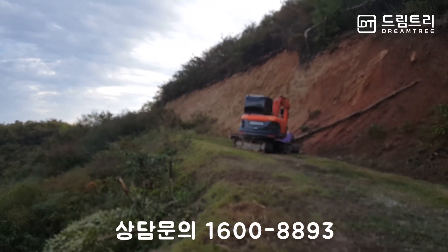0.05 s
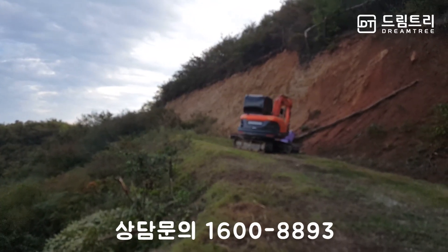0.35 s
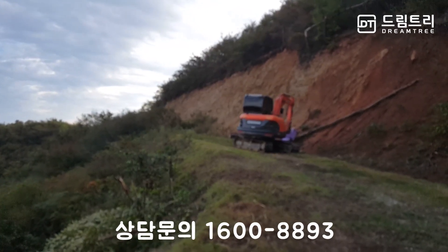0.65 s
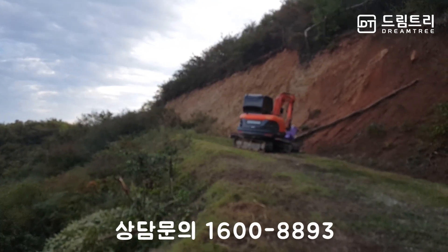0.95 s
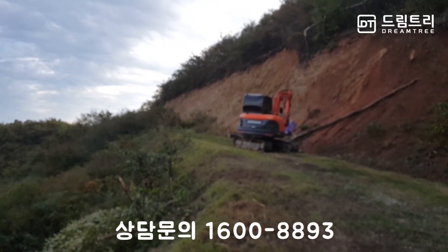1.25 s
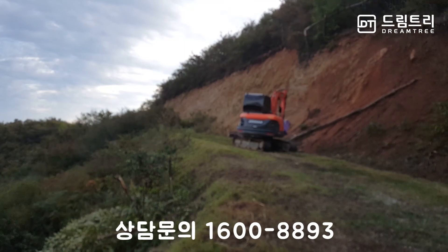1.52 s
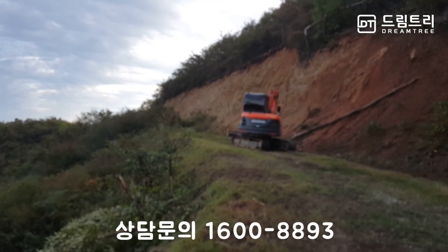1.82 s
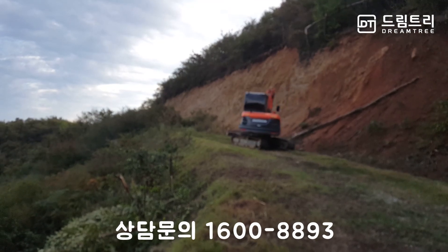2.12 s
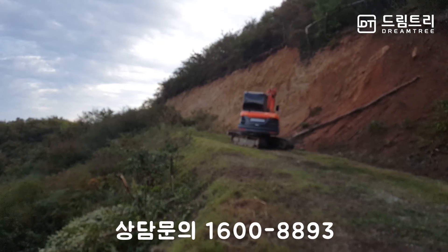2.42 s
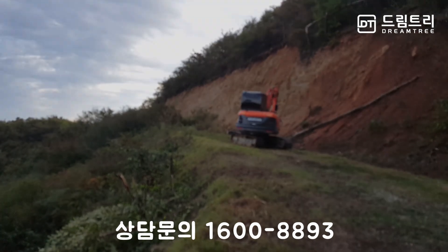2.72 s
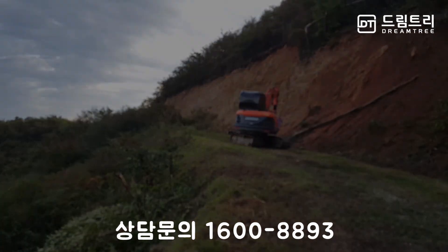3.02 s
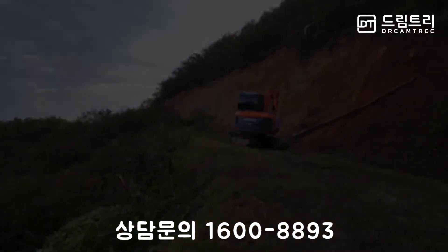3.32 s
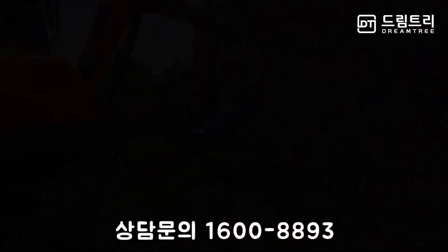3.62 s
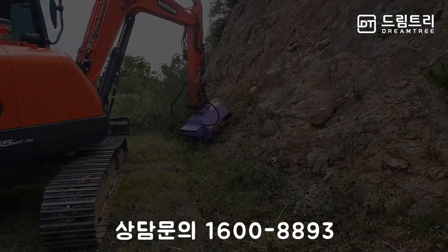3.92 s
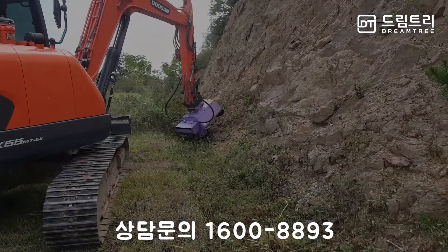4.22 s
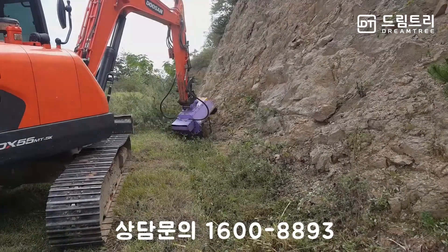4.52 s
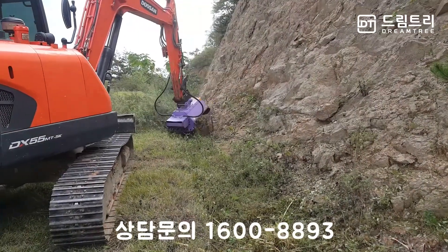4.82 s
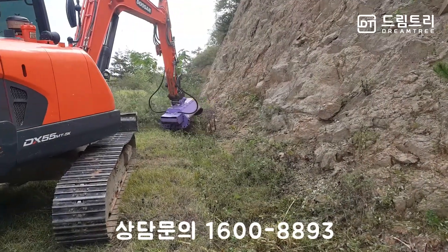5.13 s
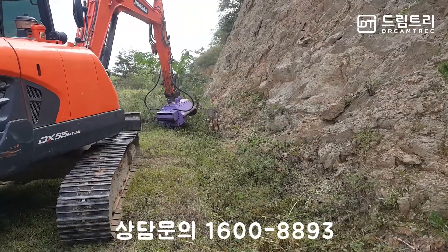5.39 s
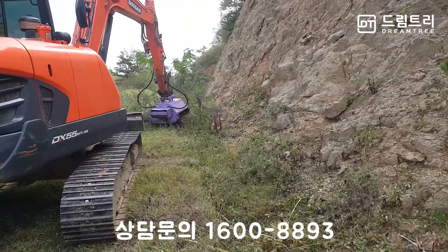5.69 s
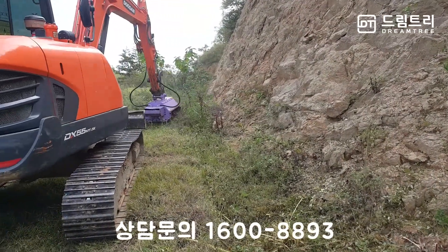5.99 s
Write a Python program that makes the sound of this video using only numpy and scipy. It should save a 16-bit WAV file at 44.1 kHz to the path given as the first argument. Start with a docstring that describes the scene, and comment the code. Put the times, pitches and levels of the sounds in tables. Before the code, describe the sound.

Heard from afar in the open, a diesel excavator hums and knocks, with light metal clanks, a few dull scrapes and faint chirping crickets. Everything fades away, and the machine fades back in right beside the microphone. Over the engine's drone, a flail cutter tears through brush: sticks snap, the head thumps the ground and stones crack against metal in a loud flurry, followed by shorter bites.

```python
"""At the foot of a rock slope, a small diesel excavator mulches brush, heard from two places in turn.
Far off, crickets chirp and leaves hiss while four cylinders drone through the exhaust and knock against
the engine panels. This fades to a short silence. Then, beside the track, the engine is close and the
flail head shreds twigs in a bright crackle, grinds into the soil and flings stones against its hood."""
import sys
import numpy as np
from scipy import signal
from scipy.fft import rfft, irfft, next_fast_len
from scipy.io import wavfile
from scipy.ndimage import uniform_filter1d, map_coordinates

SR = 44100
rng = np.random.default_rng(int(sys.argv[2]) if len(sys.argv) > 2 else 0)


def wrap_up_sound(samples):
    """Save the sound to the file named by the first command line argument, as 16-bit audio."""
    columns = np.atleast_2d(samples).T
    # keep every value between -1 and 1, then stretch to whole-number steps
    tamed = np.clip(columns, -1, 1)
    steps = np.round(tamed * 32767).astype(np.int16)
    wavfile.write(sys.argv[1], SR, steps)


N = 271215
TIME = np.arange(N) / SR
SIZE = next_fast_len(N + 4096)
FREQ = np.maximum(np.arange(SIZE // 2 + 1) * SR / SIZE, 1)

# Stereo image of the distant machine, close engine and head: freq_hz, left_minus_right_db, likeness (0-1)
FAR_IMAGE = [(150, 0.5, 0.99), (400, 2.5, 0.97), (700, 2, 0.93), (1320, 6, 0.98), (3000, 3, 0.51),
             (4130, -1.5, 1), (5500, 12.5, 0), (6550, 5.5, 0.7), (7800, -3.5, 0.4), (15000, 2, 0.4)]
ENGINE_IMAGE = [(147, 0.85, 0.95), (387, 2.8, 0.76), (790, 4.2, 0.99), (1330, 4.1, 0.74), (2400, 6.4, 0.47),
                (8000, 1.6, .2)]
HEAD_IMAGE = [(199.75, -12, 0.48), (705, 3, 0.76), (1300, 4.5, 0.88), (2400, 2.5, 1), (3930, -7, 0.4),
              (6300, 3, 0.2), (7500, -13, 0.11), (9300, -11, 0.11), (12000, 1, .1), (15000, -1.5, .1)]
# Crickets in the grass: pitch_hz, chirps_per_s, first_chirp_s, level_db, scatter_db
CRICKETS = [(4980, 15.65, 0.01, -52.5, 2), (4140, 16, 0.043, -55.5, 4.5)]
# Engine speed: time_s, firing_hz
ENGINE_SPEED = [(0, 54.6), (.55, 54.42), (.9, 54.6), (1.12, 53.6), (1.45, 54.03), (1.85, 55.67),
                (2.05, 54.43), (2.6, 54.4), (3.05, 54.04), (3.3, 54.6), (3.9, 54.2), (4.2, 54), (4.7, 54.8),
                (5.2, 54.58), (5.6, 54.16), (5.8, 53.82), (6.0, 53.2), (6.15, 54.36)]
# Hydraulic load on the distant machine: time_s, load (0-1)
HYDRAULIC_LOAD = [(0, 0.18), (.6, 0.02), (.74, 0.64), (.87, 0.33), (1.02, 0.23), (1.15, 0.87), (1.65, 0.92),
                  (2.08, 0.5), (2.28, 0.97), (2.65, 1)]

# Distant EQ of fan air and leaves, soil, exhaust, engine block, boom steel and cover: freq_hz, gain_db
FAR_HISS_EQ = [(60, -1), (600, 4), (2500, 5.5), (3500, 0), (5300, -1), (6300, 0.5), (7400, -7), (8800, -19),
               (10500, -21), (12200, -13), (14500, -21), (15700, -32.5)]
FAR_SOIL_EQ = [(50, -35), (200, 0), (350, -5.5), (490, 5.5), (700, -3), (1100, -8.5), (2000, -13),
               (4000, -18.5), (7000, -30), (10000, -44)]
FAR_EXHAUST_EQ = [(25, -28), (42, -19), (70, -9), (100, -1), (140, 2), (180, 2.5), (225, -1.5), (260, -10),
                  (340, -20), (700, -58)]
FAR_BLOCK_EQ = [(60, -42), (400, -10.5), (650, -2), (780, -11), (1170, -13), (1600, -8.5), (2100, -7),
                (3150, -13), (3400, -26), (4500, -16.5), (6400, -20), (9000, -44)]
STEEL_EQ = [(1000, -35), (2400, -28), (2900, 1), (3900, 3), (4500, -24), (8000, -32)]
COVER_EQ = [(700, -35), (1000, -9), (1200, -3), (1400, 7), (1650, -14), (2200, -36)]
# Distant resonances of engine panels, boom steel and engine cover: pitch_hz, width_hz, lift_db
FAR_PANEL_RINGS = [(586, 56, 6.2), (943, 232, 21.5), (1352, 97, 14), (1460, 160, 9.9), (1752, 200, 9.9),
                   (2706, 120, 7.4), (3050, 110, 7.5), (3920, 130, 10.4), (4980, 140, 5)]
STEEL_RINGS = [(2980, 200, 16.6), (3345, 110, 14.7), (3730, 110, 4), (3900, 140, 6)]
COVER_RINGS = [(1350, 80, 7), (1480, 80, 8.4)]
# Faders for the distant exhaust and the pipe's hum: time_s, gain_db
FAR_EXHAUST_FADER = [(0.0, -33), (0.9, -32.5), (1.15, -31), (1.4, -34), (1.52, -30), (1.56, -34),
                     (2.63, -36), (2.85, -33.5), (3.15, -36)]
FAR_HUM_FADER = [(0, -42.5), (.45, -43), (.8, -44.5), (1.05, -43), (1.5, -48.5), (1.95, -42), (2.12, -52),
                 (2.35, -42), (2.65, -46.5), (2.87, -40), (3.1, -46.5)]
# Distant exhaust harmonics, relative to the exhaust fader: firing_multiple, idle_db, full_load_rise_db
FAR_HARMONICS = [(2, -17.5, 7.5), (2.5, -20.5, 8.5), (3, -25, 4)]
# Ring of the boom steel and clang of the cover, relative to the knock: time_s, gain_db
STEEL_FADER = [(.95, -19), (1.55, -11.5), (2.3, -11.5), (3.1, -15.5), (3.3, -8.5)]
COVER_FADER = [(0, -14), (.65, -13), (.92, -25), (1.17, -19), (1.4, -17), (1.8, -31)]
# How much of the distant knock comes as distinct blows: time_s, share (0-1)
KNOCK_HARDNESS = [(0, 0.65), (.13, 0.54), (.35, 0.16), (.85, 0.52), (1.02, .3), (1.16, 0.66), (1.5, 0.63),
                  (1.85, 0.4), (2.1, 0.4), (2.45, 0.5), (3.05, 0.48), (3.25, 0.6)]
# The knock's tone colour glides slightly up and down as the machine swings: time_s, shift_percent
COLOUR_GLIDE = [(0, 0), (.9, 1.3), (1.25, 3), (1.6, -0.42), (2.0, -3), (2.5, -2), (3.2, 0)]
# Hard blows that clank out of the rattle: start_s, level_db, pitch_hz
PANEL_CLANKS = [(.119, -41, 1390), (.635, -33.5, 1480), (.779, -37, 1010), (.89, -34, 1410),
                (1.037, -36, 1410), (1.132, -32, 1320), (1.151, -34, 1005), (1.168, -30.5, 1500),
                (1.188, -37, 1380), (1.226, -40, 1000), (1.298, -37, 1500), (1.335, -32, 1344),
                (1.372, -36, 1380), (1.41, -34, 1420), (1.448, -41, 3100), (1.485, -35, 1350),
                (1.501, -34, 1370), (1.522, -38, 988), (1.576, -41, 3040), (1.594, -34.5, 982),
                (1.631, -42, 3010), (1.668, -35, 906), (1.812, -36, 947), (2.01, -36, 932),
                (2.159, -40, 1370), (2.25, -39, 920), (2.397, -38.5, 1370), (2.582, -35, 921),
                (2.8, -34, 1370), (2.931, -38, 940), (3.28, -32, 950)]
# The distant head scrapes the soil: start_s, length_s, level_db
SOIL_SCRAPES = [(0.32, 0.05, -53), (0.772, 0.037, -53), (1.915, 0.073, -45.5), (2.25, 0.065, -45),
                (2.454, 0.029, -48), (2.547, 0.042, -44.5), (2.85, 0.017, -51), (3.133, 0.08, -47.5)]
# The distant head bumps the ground: start_s, boom_db, boom_hz, clack_db
FAR_THUDS = [(1.93, -44, 398, -48), (2.265, -30, 494, -36), (2.581, -38.5, 516, -39)]

# Close EQ of exhaust, engine block, twigs, soil and hood: freq_hz, gain_db
NEAR_EXHAUST_EQ = [(25, -34), (42, -23), (70, -14), (95, -2), (135, -3), (180, -4), (245, -2), (320, -10.5),
                   (420, -8.5), (600, -17.5), (1200, -55)]
NEAR_BLOCK_EQ = [(40, -22), (150, 6), (400, -11.5), (560, 3.5), (670, -3.5), (1030, -10), (1400, -11),
                 (2100, -9), (3200, -8), (4000, -21), (7000, -25), (10000, -27), (15700, -21)]
TWIG_EQ = [(1500, -10), (3500, -12), (5300, -6), (6400, 1), (7400, 3.5), (8300, -4.5), (9500, -12.5),
           (10800, -9), (12300, -4.5), (14000, -6.5), (15700, -11)]
SOIL_EQ = [(40, -32), (150, -28), (300, -35), (600, 2.5), (1150, 3), (1400, 1.5), (2100, 1.5), (2900, 3.5),
           (4200, 4), (5300, -1.5), (7500, -4), (10000, -16), (15700, -23)]
HOOD_EQ = [(40, -35), (200, -16), (800, 12), (3000, -6), (7300, -1.5), (9500, -14), (12500, -7.5),
           (15700, -10)]
# Close resonances of engine panels and hood: pitch_hz, width_hz, lift_db
NEAR_PANEL_RINGS = [(410, 83, 5.3), (807, 122, 9.7), (903, 113, 7.2), (1210, 78, 4.8), (1563, 190, 11.4),
                    (1965, 29, 10.6), (2340, 110, 6.2), (2547.4, 110, 3.3)]
HOOD_RINGS = [(1133, 17, 14.5), (1215, 15, 3), (1642, 22, 10.5), (2889.5, 25, 4), (3450, 25, 3.5),
              (4420, 25, 7.5), (5780, 44, 6), (6400, 40, 10), (6750, 38, 16), (7390, 27, 6)]
# Close faders for whine, firing tone, exhaust (as the pipe swings), pipe hum, growl: time_s, gain_db
NEAR_WHINE_FADER = [(4.2, -40.5), (4.53, -36.5), (4.964, -37), (5.48, -51), (5.536, -41), (6.15, -31)]
NEAR_FIRING_FADER = [(3.7, -37), (4.2, -42), (5.0, -42), (5.85, -43), (6.07, -35)]
NEAR_EXHAUST_FADER = [(3.8, 1.5), (4.1, 3), (4.4, 1), (4.95, -0.5), (5.2, 1), (5.5, -1.5), (5.95, 1.5)]
NEAR_HUM_FADER = [(3.68, -35.5), (4.0, -28.5), (4.3, -28.5), (4.75, -29.5), (4.916, -31.5), (4.99, -26),
                  (5.35, -27.5), (5.814, -32), (6.1, -30)]
GROWL_FADER = [(4.42, -57), (4.6, -40), (4.7, -41), (4.82, -30.5), (4.97, -49), (5.1, -36), (5.26, -47),
               (5.37, -38.5), (5.52, -42), (5.65, -35), (5.76, -42), (5.86, -39), (5.94, -48), (6.0, -39),
               (6.1, -33), (6.15, -45.5)]
# Close harmonics of the exhaust, and of the growl near 800 Hz: firing_multiple, relative_db
NEAR_HARMONICS = [(1.5, -20), (2.5, -5), (3, -11), (5, -28), (5.5, -16.5)]
GROWL_HARMONICS = [(14, -8), (14.5, -3.5), (15, -7), (15.5, -9.5)]
# The head thumps the ground close by: start_s, level_db, pitch_hz
GROUND_THUMPS = [(4.571, -35, 137), (4.657, -27, 125), (4.734, -17, 101.6), (4.917, -28, 123)]
# The flails bite into a clump: start_s, length_s, twig_db, soil_db
FLAIL_BITES = [(3.65, 0.17, -36, -35), (4.39, 0.31, -31, -32.5), (4.512, 0.091, -33, -27.5),
               (4.597, 0.069, -33.5, -33), (4.704, 0.024, -29.5, -28.5), (4.737, 0.032, -30, -25),
               (4.769, 0.043, -30, -25.5), (4.816, 0.025, -41, -32.5), (4.848, 0.014, -43, -25),
               (4.87, .015, -38, -35), (5.04, 0.15, -39, -38.5), (5.123, 0.071, -34.5, -45),
               (5.257, 0.036, -42, -36), (5.346, 0.042, -35, -36.5), (5.63, 0.11, -37, -38.5),
               (5.797, 0.03, -34, -34), (5.85, 0.029, -35.5, -35.5), (5.89, 0.13, -38, -37),
               (6.017, .11, -48, -44)]
# Sticks snapping and stones hitting the hood, ahead of the hood EQ: start_s, gain_db, pitch_hz
STICK_SNAPS = [(.258, -45, 12300), (2.066, -50, 12000), (2.143, -44, 12480), (3.674, -35, 6400),
               (3.8165, -27.5, 7400), (3.897, -33, 6800), (3.908, -31, 6800), (3.963, -32, 7000),
               (3.977, -24.5, 5030), (3.9924, -41, 6800), (4.0294, -39, 6950), (4.0756, -33, 6040),
               (4.168, -30.5, 5994), (4.1897, -25, 5548), (4.248, -25, 5700), (4.3042, -27, 6808),
               (4.3118, -29, 6800), (4.4545, -16, 12500), (4.459, -22, 12500), (4.7207, -20, 12000),
               (4.7935, -19, 12000), (4.8913, -19, 7600), (5.977, -16, 13000)]
STONE_HITS = [(3.714, -28, 6270), (3.7895, -23.5, 6350), (4.4524, -14, 6250), (4.5285, -8, 4126),
              (4.541, -8, 4600), (4.556, -9, 6300), (4.5743, -2.5, 6100), (4.584, -5, 4260),
              (4.5974, -5, 5400), (4.7093, -4, 2700), (4.7465, -6, 6500), (4.7645, -11, 2880),
              (4.7827, -9.5, 3200), (4.7938, -6, 2900), (4.7991, -2.5, 2670), (4.8519, -11, 5100),
              (4.8612, -15, 3820), (4.916, -8.5, 4630), (5.086, -17, 4300), (5.198, -12.5, 3900),
              (5.272, -11, 3500), (5.2797, -6, 3920), (5.362, -10, 4000), (5.41, -14, 4217),
              (5.8126, -11, 3600), (5.9256, -15, 2455)]

FREE_HZ, PUSH_DB_PER_HZ, FIRST_FIRING_S = 54.43, 0.5, 0.0125  # FREE_HZ: unstrained firing rate
FAR_WORK_S = (1.0, 1.5)  # the distant head gets to work over this span
CLANK_RISE_S = 0.0033


def undb(db):
    """Decibels to gain."""
    return 10 ** (np.asarray(db) / 20)


def pan(left_db, right_db):
    """A gain for each channel."""
    return undb([[left_db], [right_db]])


def curve(table):
    """An automation line through timed points."""
    return np.interp(TIME, *np.transpose(table))


def ramp(start_s, end_s):
    """An even rise from 0 to 1."""
    return np.clip((TIME - start_s) / (end_s - start_s), 0, 1)


def contact(start_s, length_s, attack_s, release_s):
    """Envelope of the head touching something: rise, hold, die away."""
    return ramp(start_s, start_s + attack_s) * np.exp(-np.maximum(TIME - start_s - length_s, 0) / release_s)


def add(track, start_s, sound):
    """Lay a stereo sound into the track."""
    start = int(start_s * SR)
    track[:, start:start + sound.shape[1]] += sound[:, :N - start]


def spectra(table):
    """Each column of a frequency table, joined on a log axis."""
    hz, *columns = np.transpose(table)
    return [np.interp(np.log(FREQ), np.log(hz), column) for column in columns]


def eq(points, rings=()):
    """Gain over frequency: a broad shape lifted by resonances."""
    db = spectra(points)[0]
    for hz, width_hz, lift_db in rings:
        db = db + lift_db / (1 + (2 * (FREQ - hz) / width_hz) ** 2)
    return undb(db)


def drift(rate_hz):
    """Smooth random modulation with a spread of 1."""
    hold = int(SR / rate_hz)
    steps = rng.standard_normal(1024)[np.arange(N) // hold % 1024]
    smooth = uniform_filter1d(uniform_filter1d(steps, hold), hold)
    return smooth / smooth.std()


def radiate(pair, gain, image, lag_ms, band_hz=None):
    """EQ two unrelated signals and blend them to stereo; the mid gets unit rms within band_hz, if given."""
    shared, separate = rfft(pair, SIZE)
    pan_db, likeness = spectra(image)
    delay = np.exp(-2j * np.pi * FREQ * lag_ms / 1000)
    left, right = undb(pan_db / 2), undb(-pan_db / 2)
    mid_gain = np.sqrt(left ** 2 + right ** 2 + 2 * likeness * delay.real) / 2
    blend = likeness * delay * shared + np.sqrt(1 - likeness ** 2) * separate
    stereo = gain / mid_gain * np.array([left * shared, right * blend])
    if band_hz:
        mid = stereo.mean(axis=0)[(FREQ > band_hz[0]) & (FREQ < band_hz[1])]
        stereo /= np.sqrt(2 * np.sum(abs(mid) ** 2) / (SIZE * N))
    return irfft(stereo, SIZE)[:, :N]


def puffs(phase, decay, scatter_db, steady):
    """A noise burst at every firing over a steady bed; phase and decay count firings."""
    strength = undb(scatter_db * rng.standard_normal(512))[phase.astype(int)]
    return rng.standard_normal((2, N)) * (steady + strength * np.exp(-(phase % 1) / decay))


def crackle(per_s, spread_db, tail_ms, bed):
    """Many small snaps, a few of them large, each a short spray of noise over an even rustle."""
    chance, luck = rng.random((2, N))
    snap_db = spread_db * np.minimum(-np.log(1 - luck), 4)
    power = (chance < per_s / SR) * undb(snap_db) ** 2
    power = signal.lfilter([1], [1, -np.exp(-2000 / (tail_ms * SR))], power)
    return rng.standard_normal((2, N)) * np.sqrt(power / power.mean() + bed)


def tone(phase, multiple, waver_db, jitter_rad, rate_hz=14):
    """One engine harmonic, wavering in level and phase, a little to the left."""
    angle = 2 * np.pi * (multiple * phase + rng.random()) + jitter_rad * drift(rate_hz)
    return np.sqrt(2) * np.sin(angle) * undb(waver_db * drift(rate_hz)) * pan(.55, -.55)


def tone_stack(phase, harmonics, waver_db, jitter_rad):
    """Several engine harmonics, each wavering on its own."""
    return sum(undb(db) * tone(phase, multiple, waver_db, jitter_rad) for multiple, db in harmonics)


def crickets(width_s=0.0089, fall_hz_per_s=3000):
    """Even trains of short, slightly falling chirps, each a little different, off to the left."""
    out = np.zeros(N)
    for hz, rate, first_s, db, scatter_db in CRICKETS:
        beat = (TIME - first_s) * rate
        chirp = np.round(beat).astype(int)
        age = (beat - chirp) / rate
        gain = undb(db + scatter_db * np.clip(rng.standard_normal(256), -2, 1))[chirp]
        pitch_hz = hz * (1 + .012 * drift(260)) - fall_hz_per_s * age
        out += gain * np.exp(-.5 * (age / width_s) ** 2) * np.sin(2 * np.pi * np.cumsum(pitch_hz) / SR)
    return out * pan(0, -12)


def far_hiss(work):
    """A bed of fan air and leaves that lifts as the head gets to work."""
    leaves = crackle(per_s=400, spread_db=2.2, tail_ms=4, bed=3)
    hiss = radiate(leaves, eq(FAR_HISS_EQ), FAR_IMAGE, lag_ms=-0.054, band_hz=(5300, 9000))
    return undb(-61.5 + 3.5 * work) * hiss


def far_whines(phase, load, work):
    """A machine whine softens under load; the hydraulic pump's higher one eases as the head works."""
    whine = undb(-48.5 - 11 * load) * tone(phase, 10, waver_db=2, jitter_rad=.16)
    pump = undb(-59 - 2 * work) * tone(phase, 42, waver_db=3, jitter_rad=1.5, rate_hz=70)
    return whine + pump


def far_grinding(work):
    """The distant head rubs through soil: a dull crackle that flares at each scrape."""
    soil = crackle(per_s=300, spread_db=2, tail_ms=10, bed=.6)
    grind = radiate(soil, eq(FAR_SOIL_EQ), FAR_IMAGE, lag_ms=-0.022, band_hz=(310, 520))
    scrapes = sum(undb(db) * contact(start_s, length_s, attack_s=0.019, release_s=0.013)
                  for start_s, length_s, db in SOIL_SCRAPES)
    return np.hypot(undb(-55 + 3 * work), scrapes) * grind


def far_thuds(attack_s=0.0018, clack_s=0.0044, boom_s=0.03):
    """The head bumps the ground: a dull clack, and its hood booms briefly."""
    out = np.zeros(N)
    noise = signal.lfilter(*signal.butter(2, [600, 2400], "band", fs=SR), rng.standard_normal(N))
    for start_s, boom_db, hz, clack_db in FAR_THUDS:
        age = np.maximum(TIME - start_s, 0)
        boom = undb(boom_db) * np.sin(2 * np.pi * hz * age) * np.exp(-age / boom_s)
        clack = undb(clack_db) * noise / noise.std() * np.exp(-age / clack_s)
        out += (boom + clack) * (1 - np.exp(-age / attack_s))
    return out * pan(1, -1)


def far_exhaust(phase, push_db, load):
    """Gas pulses drone and rumble out of the pipe; the harmonics fill out under load."""
    fader_db = curve(FAR_EXHAUST_FADER)
    drone = undb(-49.5 + 4.5 * load + push_db) * tone(phase, 1, waver_db=2, jitter_rad=.06)
    for multiple, idle_db, rise_db in FAR_HARMONICS:
        gain = undb(fader_db + idle_db + rise_db * load)
        drone += gain * tone(phase, multiple, waver_db=3, jitter_rad=.37)
    hum = undb(curve(FAR_HUM_FADER)) * tone(phase, 4, waver_db=1.5, jitter_rad=.25)
    gas = puffs(phase, decay=.45, scatter_db=3, steady=.55)
    rumble = radiate(gas, eq(FAR_EXHAUST_EQ), FAR_IMAGE, lag_ms=0, band_hz=(85, 260))
    return drone + hum + undb(fader_db - 4.5) * rumble


def diesel_blows(phase, hardness, width_s=0.003, scatter_db=1.3):
    """One short blow a firing, each of much the same colour, standing out of an even rattle."""
    firings = np.flatnonzero(np.diff(np.floor(phase)) > 0)
    length = 1024
    window = np.exp(-.5 * ((np.arange(length) - length // 2) / SR / width_s) ** 2)
    colours = rfft(rng.standard_normal((400, 2, length)) * window)
    bursts = irfft(colours / np.sqrt(abs(colours)))  # flatter spectra make the blows alike
    gains = undb(scatter_db * rng.standard_normal(len(bursts)))
    blows = np.zeros((2, N + length))
    for start, gain, burst in zip(firings, gains, bursts):
        blows[:, start:start + length] += gain * burst * np.sqrt(window)
    blows = blows[:, length // 2:][:, :N]
    return np.sqrt(hardness) * blows / blows.std() + np.sqrt(1 - hardness) * rng.standard_normal((2, N))


def far_clatter(phase, load):
    """Diesel blows shake the panels, boom steel and cover; the colour glides while the beat keeps time."""
    glide_percent = curve(COLOUR_GLIDE) + .7 * drift(25)
    clock = np.cumsum(1 + glide_percent / 100) / SR
    # Blows are laid out on a warped clock, so the varispeed below shifts only their colour.
    blows = diesel_blows(np.interp(TIME, clock, phase), curve(KNOCK_HARDNESS))
    knock = radiate(blows, eq(FAR_BLOCK_EQ, FAR_PANEL_RINGS), FAR_IMAGE, -0.0087, band_hz=(850, 3500))
    steel = radiate(blows, eq(STEEL_EQ, STEEL_RINGS), FAR_IMAGE, -0.023, band_hz=(2500, 4500))
    cover = radiate(blows, eq(COVER_EQ, COVER_RINGS), FAR_IMAGE, -0.0087, band_hz=(850, 3500))
    clatter = knock + undb(curve(STEEL_FADER)) * steel + undb(curve(COVER_FADER)) * cover
    gliding = np.array([map_coordinates(side, [clock * SR], order=3, mode="mirror") for side in clatter])
    accents = sum(np.maximum(1 - ((TIME - start_s) / CLANK_RISE_S - 1) ** 2, 0)
                  for start_s, _, _ in PANEL_CLANKS)
    return undb(-44.5 + 3 * load + 0.6 * accents) * gliding


def far_clanks():
    """A hard blow leaves one panel ringing for a few milliseconds."""
    out = np.zeros((2, N))
    age = np.arange(2048) / SR
    envelope = (age / CLANK_RISE_S * np.exp(1 - age / CLANK_RISE_S)) ** 2
    for start_s, db, hz in PANEL_CLANKS:
        ring = np.sin(2 * np.pi * (hz * age + rng.random()))
        add(out, start_s, undb(db) * pan(2, -2.5) * envelope * ring)
    return out


def near_whine(phase):
    """A machine whine holds at ten times the firing rate."""
    return undb(curve(NEAR_WHINE_FADER) - 0.8) * tone(phase, 10, waver_db=1.1, jitter_rad=.15)


def near_exhaust(phase, push_db, bite_power, lag_s=0.12, strain_db=4):
    """The pipe drones and hums, and a growl rises and falls near 800 Hz; bites strain the engine, so the
    exhaust swells a little late."""
    strain = np.sqrt(signal.lfilter([1], [1, -np.exp(-1 / (lag_s * SR))], bite_power))
    level_db = -33 + strain_db * strain / strain.max() + curve(NEAR_EXHAUST_FADER)
    drone = undb(curve(NEAR_FIRING_FADER) + push_db) * tone(phase, 1, waver_db=2, jitter_rad=.08)
    drone += undb(level_db - 4.5) * tone(phase, 2, waver_db=1.5, jitter_rad=.2)
    drone += undb(level_db) * tone_stack(phase, NEAR_HARMONICS, waver_db=1.6, jitter_rad=.5)
    growl = undb(curve(GROWL_FADER)) * tone_stack(phase, GROWL_HARMONICS, waver_db=1.5, jitter_rad=.8)
    hum = undb(curve(NEAR_HUM_FADER) - 0.5) * tone(phase, 4, waver_db=1.4, jitter_rad=.15, rate_hz=27)
    gas = puffs(phase, decay=.4, scatter_db=2, steady=.8)
    rumble = radiate(gas, eq(NEAR_EXHAUST_EQ), ENGINE_IMAGE, lag_ms=.2, band_hz=(80, 190))
    return drone + growl + hum + undb(level_db - 1.5) * rumble


def near_knock(phase):
    """Firings rattle the block and panels, louder as the side grille comes round to the listener."""
    firings = puffs(phase, decay=.05, scatter_db=2, steady=.97)
    body = eq(NEAR_BLOCK_EQ, NEAR_PANEL_RINGS)
    knock = radiate(firings, body, ENGINE_IMAGE, lag_ms=0.34, band_hz=(600, 1000))
    return undb(-38.5 + 4.5 * ramp(5, 6.78)) * knock


def ground_thumps(attack_s=0.0058, decay_s=0.028):
    """The head drops onto the soil: a few deep, quickly damped swings."""
    out = np.zeros((2, N))
    age = np.arange(SR // 4) / SR
    envelope = (1 - np.exp(-age / attack_s)) * np.exp(-age / decay_s)
    envelope /= envelope.max()
    for start_s, db, hz in GROUND_THUMPS:
        add(out, start_s, undb(db) * pan(0, 0) * envelope * np.sin(2 * np.pi * hz * age))
    return out


def stick_snaps(snap_s=0.0019, splinter_s=0.022, splinter_db=-15):
    """A stick breaks with one dry snap and a spray of splinters."""
    out = np.zeros((2, N))
    age = np.arange(4096) / SR
    envelope = np.exp(-age / snap_s) + undb(splinter_db) * np.exp(-age / splinter_s)
    for start_s, db, hz in STICK_SNAPS:
        wood = signal.lfilter(*signal.iirpeak(hz, Q=1 / 0.69, fs=SR), rng.standard_normal((2, len(age))))
        add(out, start_s, undb(db) * wood / wood.std() * envelope)
    return out


def stone_hits(crack_s=0.0011, ring_s=0.0099, crack_db=-11, ring_db=-13):
    """A flung stone gives a crack and a short, rough ring of the hood."""
    out = np.zeros((2, N))
    age = np.arange(4096) / SR
    for start_s, db, hz in STONE_HITS:
        noise = rng.standard_normal((2, len(age)))
        crack = undb(crack_db) * noise * np.exp(-age / crack_s)
        metal = signal.lfilter(*signal.iirpeak(hz, Q=1 / 0.11, fs=SR), noise)
        ring = undb(ring_db) * metal / metal.std() * np.exp(-age / ring_s)
        add(out, start_s, undb(db) * (crack + ring))
    return out


def bite_powers():
    """Each bite into a clump sends a surge of power to the twig and soil layers."""
    twigs, soil = np.zeros((2, N))
    for start_s, length_s, twig_db, soil_db in FLAIL_BITES:
        envelope = contact(start_s, length_s, attack_s=0.26 * length_s, release_s=0.017)
        twigs += (undb(twig_db) * envelope) ** 2
        soil += (undb(soil_db) * envelope) ** 2
    return twigs, soil


def flail_head(twig_power, soil_power):
    """Twigs shred in a bright spray; soil and wood grind lower down, and each bite rings the hood."""
    depth = ramp(4.29, 4.37)  # the head sinks into the brush
    twigs = crackle(per_s=1900, spread_db=3.9, tail_ms=.8, bed=.7)
    soil, clods = (crackle(per_s=900, spread_db=3, tail_ms=14, bed=.21) for _ in range(2))
    shred = radiate(twigs, eq(TWIG_EQ), HEAD_IMAGE, lag_ms=0.075, band_hz=(5500, 15000))
    grind = radiate(soil, eq(SOIL_EQ), HEAD_IMAGE, lag_ms=0.057, band_hz=(1800, 4500))
    bite = radiate(clods, eq(SOIL_EQ, HOOD_RINGS), HEAD_IMAGE, lag_ms=0.04, band_hz=(1800, 4500))
    shred_gain = np.sqrt(undb(-46 + 8 * depth) ** 2 + twig_power)
    return shred_gain * shred + undb(-42.5 + 5 * depth) * grind + np.sqrt(soil_power) * bite


def scene():
    """The distant mix fades out; after a beat of silence the close mix fades in."""
    firing_hz = curve(ENGINE_SPEED)
    phase = np.cumsum(firing_hz) / SR + 1 - FIRST_FIRING_S * FREE_HZ
    # The governor lets the engine sag under strain, and each firing then pushes harder.
    push_db = PUSH_DB_PER_HZ * (FREE_HZ - firing_hz)
    load, work = curve(HYDRAULIC_LOAD), ramp(*FAR_WORK_S)
    twig_power, soil_power = bite_powers()
    far = crickets() + far_hiss(work) + far_whines(phase, load, work) + far_grinding(work)
    far += far_thuds() + far_exhaust(phase, push_db, load) + far_clatter(phase, load) + far_clanks()
    near = near_whine(phase) + near_exhaust(phase, push_db, twig_power + soil_power) + near_knock(phase)
    near += ground_thumps() + flail_head(twig_power, soil_power)
    debris = radiate(stone_hits() + stick_snaps(), eq(HOOD_EQ), HEAD_IMAGE, lag_ms=0.011)
    fade_out = (1 - ramp(2.93, 3.625)) * (TIME < 3.556)
    fade_in = ramp(3.584, 4.41) * (TIME > 3.628)
    return far * fade_out + near * fade_in + debris


def record(dry):
    """A steep low-pass trims the very top."""
    return signal.sosfilt(signal.ellip(10, .2, 80, 15600, fs=SR, output="sos"), dry)


dry = scene()
out = record(dry)
wrap_up_sound(out)
```